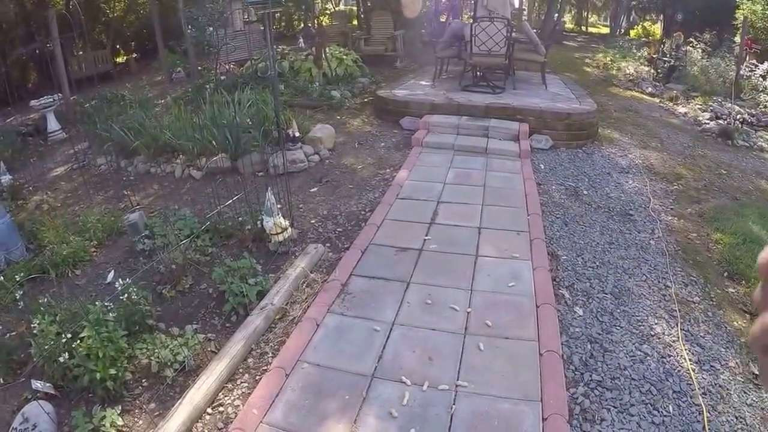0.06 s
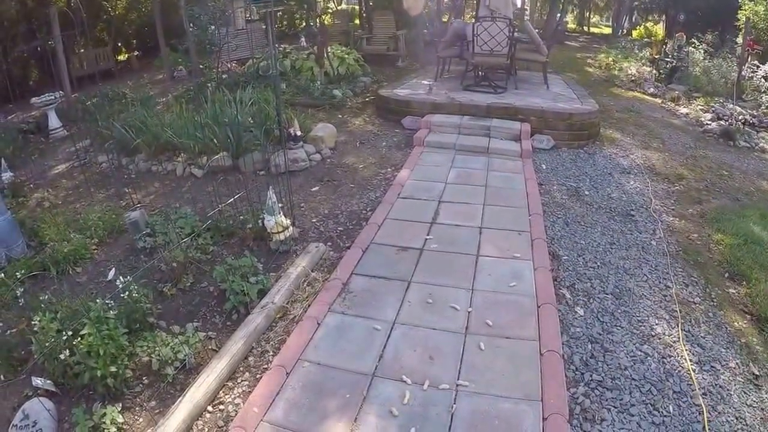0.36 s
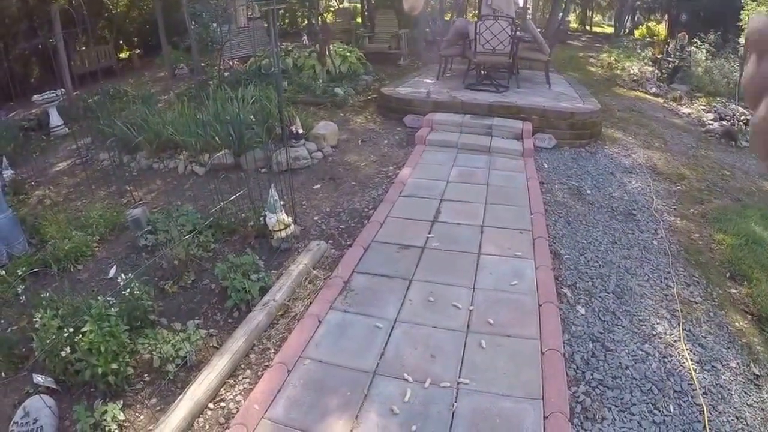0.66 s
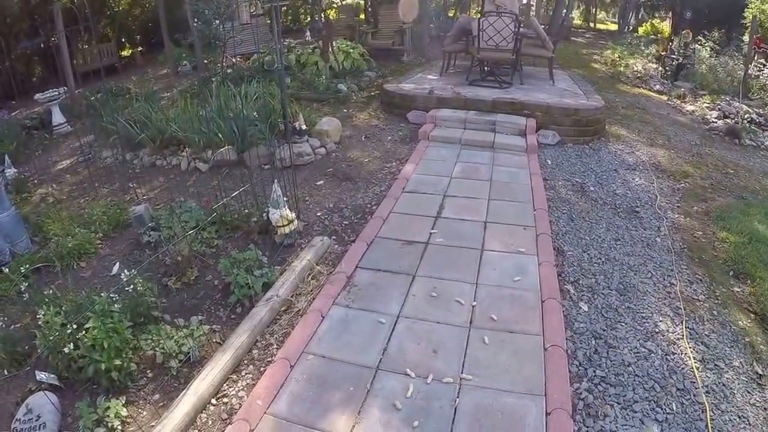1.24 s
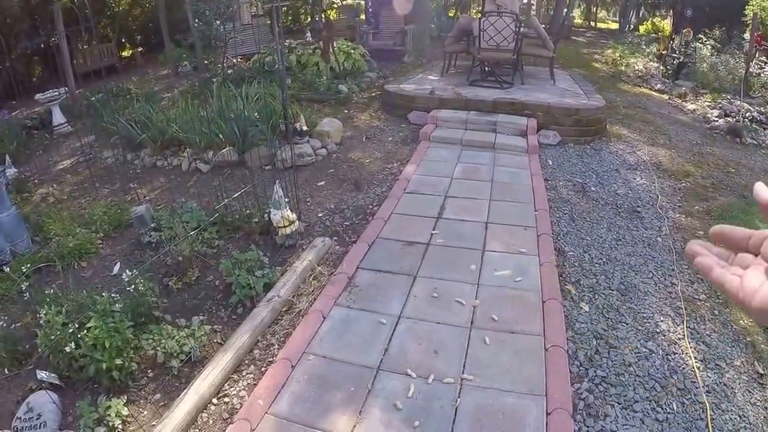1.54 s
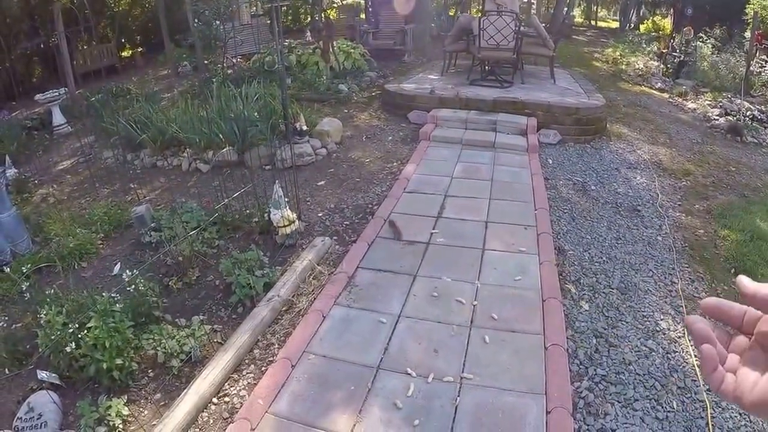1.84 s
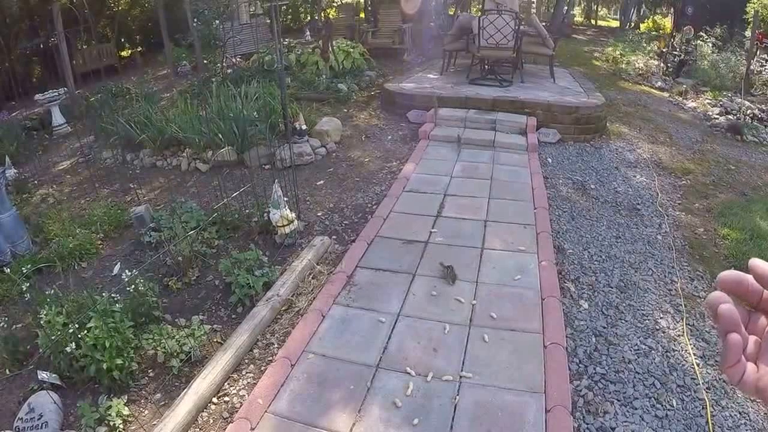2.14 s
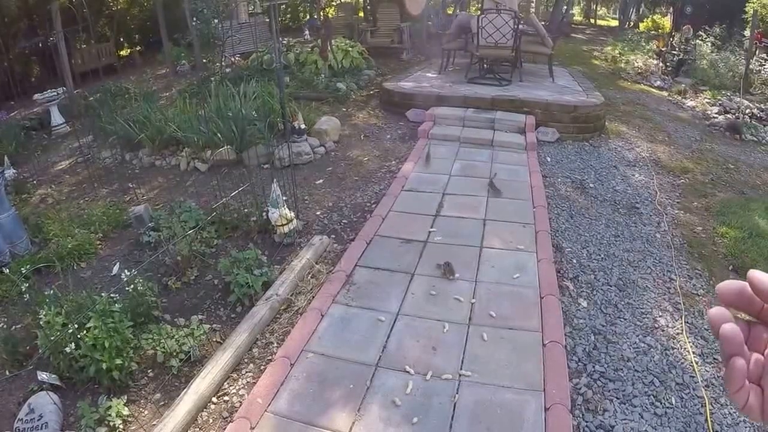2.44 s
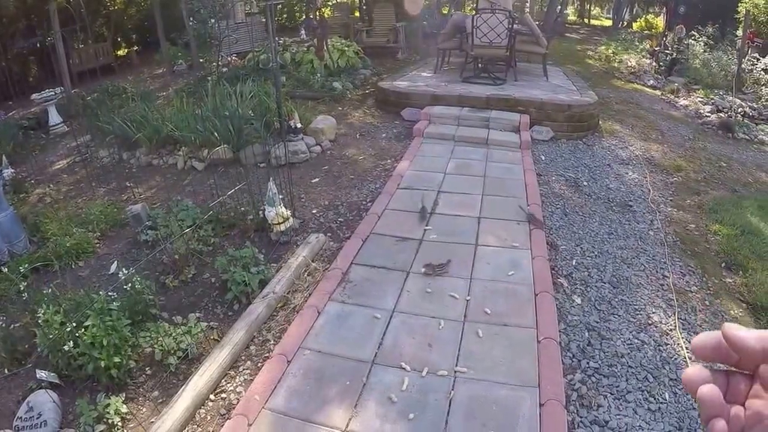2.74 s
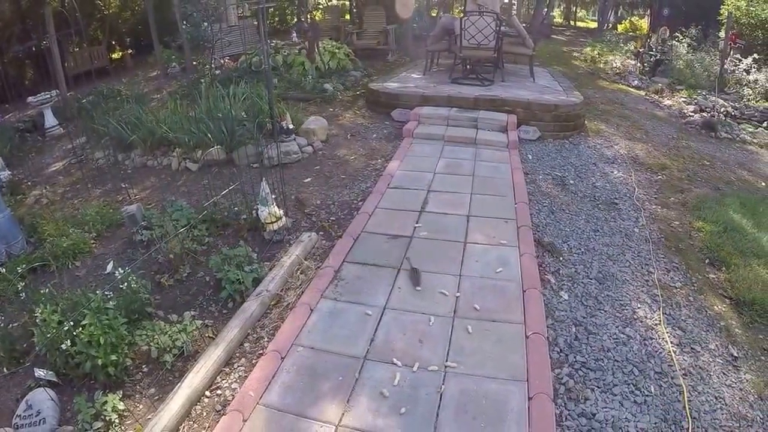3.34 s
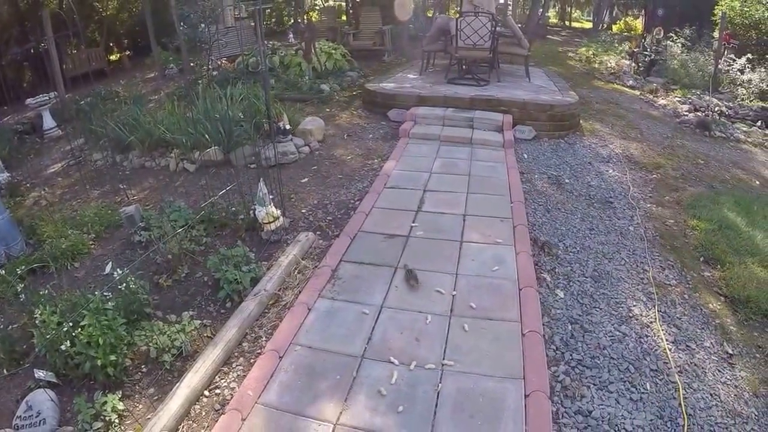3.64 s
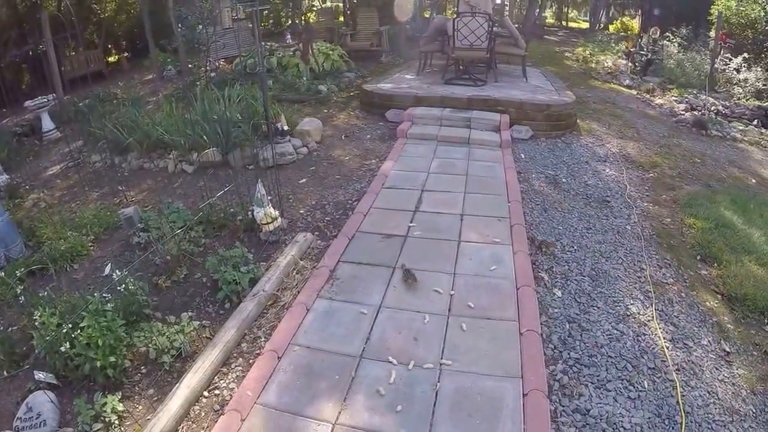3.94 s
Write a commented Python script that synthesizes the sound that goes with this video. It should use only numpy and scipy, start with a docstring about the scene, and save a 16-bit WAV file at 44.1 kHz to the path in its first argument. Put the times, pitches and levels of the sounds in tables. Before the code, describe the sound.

Nuts in their shells are tossed onto a paved garden path: a few light ticks, a loud cluster of hollow clacks, then duller tumbles. A small bird chirps faintly and a distant engine swells over steady outdoor hiss.

```python
"""A paved garden path. Nuts in their shells are tossed onto it: two loud clusters of clacks, then duller
tumbles and small ticks. Each contact rings a hollow shell, and the garden gives a short, thin echo.
A small bird chips faintly in the trees, a distant engine's exhaust swells as its note sinks, and a soft
bump comes near the end. Under it all lie low air rumble, steady hiss, far insects and a faint hum."""
import sys
import numpy as np
from scipy import signal
from scipy.fft import rfft, irfft, next_fast_len
from scipy.io import wavfile
from scipy.ndimage import map_coordinates

SR = 44100
rng = np.random.default_rng(int(sys.argv[2]) if len(sys.argv) > 2 else 0)


def to_wav(sig):
    """Store sig (one row per channel, or 1-D mono) as 16-bit WAV at the path in sys.argv[1].

    Samples outside -1..1 are clipped; the rate is SR.
    """
    pcm = np.clip(np.atleast_2d(sig), -1, 1) * 32767
    pcm = np.round(pcm).astype(np.int16)
    wavfile.write(sys.argv[1], SR, pcm.T)  # frames by channels


N = 176400


def amp(db):
    """Decibels to gain."""
    return 10 ** (np.asarray(db) / 20)


def unit(x):
    """Scale to rms 1."""
    return x / np.sqrt(np.mean(x ** 2) + 1e-20)


def along(points, hz):
    """Read a curve of (f/Hz, value) points on a log frequency axis."""
    f, v = np.transpose(points)
    return np.interp(np.log(hz + 1), np.log(f + 1), v)


def wobble(rate):
    """Smooth random modulation, rate knots a second."""
    return map_coordinates(rng.standard_normal(int(N * rate / SR) + 4), [np.arange(N) * rate / SR])


def noise(spectrum, size):
    """Coloured noise of rms 1."""
    eq = amp(along(spectrum, np.fft.rfftfreq(size, 1 / SR)))
    return unit(irfft(rfft(rng.standard_normal(size)) * eq, size))


def add(track, s, sound):
    """Mix a sound into a track at s seconds."""
    part = track[round(s * SR):][:len(sound)]
    part += sound[:len(part)]


def echo(x, t60, colour):
    """Diffuse reflections: a noise tail with a decay curve (f/Hz, t60/s) and an EQ (f/Hz, gain/dB)."""
    hz, t, bands = signal.stft(rng.standard_normal(SR // 2), SR, nperseg=256)
    bands = bands * amp(-60 * t / along(t60, hz)[:, None])
    plain = signal.istft(bands, SR, nperseg=256)[1]
    tail = signal.istft(bands * amp(along(colour, hz))[:, None], SR, nperseg=256)[1]
    attack = 1 - np.exp(-np.arange(len(tail)) / SR / 0.0014)
    return signal.fftconvolve(x, tail * attack / np.linalg.norm(plain))


# Low end of the outdoor air: f/Hz, relative level/dB
RUMBLE_SPECTRUM = [(10, -13), (22, -1), (38, 1.5), (58, -2), (85, -6.5), (120, -7.5), (190, -15),
                   (290, -21.5), (450, -16.5), (680, -40.5), (1200, -52)]
# Broad hiss, fullest in the mids: f/Hz, relative level/dB
HISS_SPECTRUM = [(350, -40), (600, -1), (760, -4), (960, -0.5), (1150, -6.5), (2150, -11.5), (2650, -7.5),
                 (3250, -16.5), (4400, -17), (4750, -11.5), (5300, -17.5), (6300, -21.5), (8600, -31),
                 (15300, -41.5)]
# Narrow, high sheen of far insects: f/Hz, relative level/dB
INSECT_SPECTRUM = [(5500, -52.5), (6900, -8), (7200, -5), (7500, 1), (8000, -3.5), (8350, -13.5),
                   (10000, -54.5)]


def air():
    """The ambience bed: uneven rumble, even hiss, far insects and a faint, wavering hum."""
    rumble = amp(-44 + 1.48 * wobble(25)) * noise(RUMBLE_SPECTRUM, N)
    hiss = amp(-60.5) * noise(HISS_SPECTRUM, N)
    hum_hz = 419
    hum = amp(-66.5 + 2 * wobble(3.4)) * np.sin(2 * np.pi * hum_hz * np.arange(N) / SR + wobble(4))
    insects = amp(-71.5) * noise(INSECT_SPECTRUM, N)
    return rumble + hiss + hum + insects


# Engine automation: t/s, firing rate/Hz, level/dB, lift of the upper harmonics/dB
ENGINE_MOVES = [(0, 42.4, -54, -2.5), (0.902, 41.58, -61, -0.5), (1.299, 40.82, -51.5, -3),
                (2.199, 38.8, -51.5, -3), (2.701, 37.7, -52, -1), (3.1, 36.39, -40, -2),
                (3.27, 35.18, -45, 1.5), (3.4, 35.05, -38, -4), (3.6, 35.1, -38.5, -2.5),
                (3.8, 34.9, -37.5, 3.5), (4, 34.83, -37, 4)]
# Exhaust tone: harmonic number -> relative level/dB
EXHAUST_HARMONICS = {1: -21, 2: -1.5, 3: -5.5, 4: -6.5, 5: -15.5, 6: -8, 7: -14, 8: -23, 9: -27}


def engine():
    """Muffled, uneven exhaust pulses from far off: the note sinks as the throb grows and brightens."""
    times, *lanes = np.transpose(ENGINE_MOVES)
    firing_hz, db, lift_db = [np.interp(np.arange(N) / SR, times, lane) for lane in lanes]
    jitter = 1 + .005 * wobble(14)
    phase = 2 * np.pi * np.cumsum(firing_hz * jitter) / SR
    throb = np.zeros(N)
    for k, harmonic_db in EXHAUST_HARMONICS.items():
        waver_db = 3 * wobble(7.8)
        gain = amp(harmonic_db + lift_db * (k >= 5) + waver_db)
        throb += gain * np.cos(k * phase + 0.75 * wobble(9.7))
    return np.sqrt(2) * amp(db) * throb


# Bird cues: t/s, f/Hz, level/dB, buzz/0-1
BIRD_CHIPS = [(.035, 5040, -57, 0.2), (.505, 5310, -59.5, 0.5), (.975, 5387, -59.5, 1),
              (1.42, 5050, -59.5, 0.58), (2.525, 5096, -55, 0.2), (2.955, 4970, -57.5, 0.38),
              (3.155, 5209, -66, 0.6), (3.315, 4900, -59, 0.44), (3.505, 5250, -62.5, 0.6)]


def bird(chip_s=0.051, fall_hz_per_s=500, flutter_hz=300):
    """Short, slightly falling chips, roughened by fast pitch flutter and smeared by the trees."""
    out, t = np.zeros(N), np.arange(int(chip_s * SR)) / SR
    for s, hz, db, buzz in BIRD_CHIPS:
        flutter = buzz * flutter_hz * wobble(400)[:len(t)]
        pitch = hz - fall_hz_per_s * (t - chip_s / 2) + flutter
        chip = amp(db) * np.sin(np.pi * t / chip_s) * np.sin(2 * np.pi * np.cumsum(pitch) / SR)
        add(out, s, chip)
        add(out, s, amp(-2.5) * echo(chip, t60=[(1, .5)], colour=[(1, 0)]))
    return out


def blip(s, db, hz, width_s):
    """A tone under a bell-shaped envelope centred on s seconds."""
    t = np.arange(N) / SR - s
    return -amp(db) * np.exp(-.5 * (t / width_s) ** 2) * np.cos(2 * np.pi * hz * t)


# Tiny ping on top of the bump: t/s, level/dB, f/Hz, width/s
BUMP_PING = (3.6955, -38, 5080, .0022)


def bump():
    """One soft, low knock with a tiny ping just behind it."""
    return blip(s=3.6878, db=-22, hz=372, width_s=0.0011) + blip(*BUMP_PING)


def burst(spectrum, t, t60, rise_s=0.00082):
    """A contact transient: a puff of coloured noise whose energy is the same from hit to hit."""
    envelope = amp(-60 * t / t60) * (1 - np.exp(-t / rise_s))
    return unit(noise(spectrum, len(t)) * envelope) * np.sqrt(np.mean(envelope ** 2))


# Modes of a hollow nutshell: f/Hz, relative level/dB, t60/s
SHELL_MODES = [(2480, -17.5, 0.00995), (4660, -15.5, 0.016), (4910, -1.5, 0.0075), (5320, -8.5, .006),
               (6090, -24, 0.0046)]


def shell_ring(pitch, t, scatter_db=1.46, rise_s=.0003):
    """A struck shell rings for a few milliseconds, with a new balance of modes on every hit."""
    ring = np.zeros(len(t))
    for hz, db, t60 in SHELL_MODES:
        decay = amp(db - scatter_db * rng.normal() - 60 * t / t60)
        ring += decay * np.sin(2 * np.pi * hz * pitch * t)
    attack = 1 - np.exp(-(t / rise_s) ** 2)
    return ring * attack


# Dull body of a hit: f/Hz, relative level/dB
THUD_SPECTRUM = [(100, -36), (250, -20), (400, -4.5), (650, -11), (950, 5), (1350, 7.5), (1800, 5.5),
                 (2600, -2), (6000, -25.5), (15000, -53)]
# Hollow knock of a hit: f/Hz, relative level/dB
KNOCK_SPECTRUM = [(600, -4.5), (1500, -7), (1900, 0), (2200, -12), (2650, 11), (3000, 1), (3350, -23.5),
                  (4500, 2.5), (6200, -9), (7200, -16), (15000, -41)]
# Bright edge of a hit: f/Hz, relative level/dB
CRACK_SPECTRUM = [(1000, -13), (5000, -1.5), (7100, -13), (8100, -1), (10000, -6.5), (12200, -3.5),
                  (14300, -1), (15400, -20.5)]
# Colour of the garden's echo: f/Hz, gain/dB
GARDEN_EQ = [(200, 25), (1200, -4.5), (2700, 0.5), (4500, -10), (5700, -3.5), (8000, 1), (15000, -5)]
# Decay of the echo from the far trees: f/Hz, t60/s
TREE_DECAY = [(200, .35), (2000, .33), (5500, 0.4), (14000, 0.29)]
# Nuts hitting the paving: t/s, ring level/dB, shell pitch/ratio, knock/dB, thud/dB, crack/dB
NUT_HITS = [(0.7143, -57, 0.73, -35.5, -50, -63), (.7524, -46, 1.4, -43, -42, -51),
            (0.7705, -53, 1.2, -49, -62, -55), (1.2352, -48, 0.78, -46, -47.5, -68),
            (1.304, -49, 1, -46.5, -46, -64), (1.7255, -18.5, 1.08, -26.5, -26.5, -27),
            (1.7305, -11.5, 1.06, -37, -25.5, -22.5), (1.7317, -17.5, 0.9, -35, -36, -29),
            (1.791, -2.5, 1.075, -27, -33, -23.5), (1.7933, -11.5, .99, -30, -31, -25),
            (1.8053, -5, .95, -23.5, -31, -23.5), (1.846, -29, 0.96, -38.5, -42, -42),
            (2.0219, -46, 0.6, -25.5, -30.5, -51), (2.0273, -28, 0.58, -24.5, -33, -40.5),
            (2.054, -32, 0.85, -36, -40, -53), (2.0665, -46, 1.08, -50, -50, -57),
            (2.0773, -39, 1.1, -47, -35, -49), (2.0833, -49, 0.64, -36, -33, -58),
            (2.0858, -31.5, 1.17, -57, -30.5, -42.5), (2.0922, -27, 1, -35, -26.5, -38.5),
            (2.103, -37, 0.803, -38, -50, -54), (2.129, -43, 0.95, -45, -41, -59),
            (2.163, -47, 1.03, -49, -60, -63), (2.2282, -32.5, 1.113, -33, -41.5, -47),
            (2.3025, -31.5, 1, -40, -44, -57), (2.305, -43.5, 1.03, -38, -50, -55),
            (2.4815, -30.5, 1.1, -31.5, -47, -52), (2.486, -32, .97, -35, -44, -54.5),
            (2.5032, -48, .95, -45.5, -66, -66.5), (2.594, -45, 0.98, -46, -58, -71),
            (2.6037, -45.5, 0.94, -46, -58, -70), (3.2186, -61, .9, -47.5, -41.5, -63.5),
            (3.5067, -52, .9, -52, -57, -64), (3.571, -38, 1.07, -44.5, -53, -48.5),
            (3.683, -44, .95, -41, -39.5, -59), (3.693, -52, 0.72, -46, -58, -42),
            (3.698, -36, 0.94, -46, -42.5, -47)]


def nuts(wall_delay_s=0.016):
    """Each contact with the paving layers shell ring, thud, knock and crack; the garden answers."""
    out, t = np.zeros(N), np.arange(2048) / SR
    for s, ring_db, pitch, knock_db, thud_db, crack_db in NUT_HITS:
        ring = amp(ring_db) * shell_ring(pitch, t)
        thud = amp(thud_db) * burst(THUD_SPECTRUM, t, t60=.011)
        knock = amp(knock_db) * burst(KNOCK_SPECTRUM, t, t60=.011)
        crack = amp(crack_db) * burst(CRACK_SPECTRUM, t, t60=.008)
        clack = ring + thud + knock + crack
        add(out, s, clack)
        add(out, s + wall_delay_s, amp(-18.5) * clack)  # one early reflection
        add(out, s, amp(-9.5) * echo(clack, [(1, 0.11)], GARDEN_EQ))  # ground and borders close by
        add(out, s, amp(-14.5) * echo(clack, TREE_DECAY, GARDEN_EQ))  # far trees
    return out


def scene():
    """The mono mix: nuts up front, the garden behind."""
    return (nuts() + bird() + engine() + bump() + air())[None]


def record(dry, cutoff_hz=15150):
    """A steep low-pass takes the very top off the mix."""
    size = next_fast_len(N + SR // 2)
    low_pass = 1 / (1 + (np.fft.rfftfreq(size, 1 / SR) / cutoff_hz) ** 120)
    return irfft(rfft(dry, size) * low_pass, size)[..., :N]


dry = scene()
out = record(dry)
to_wav(out)
```